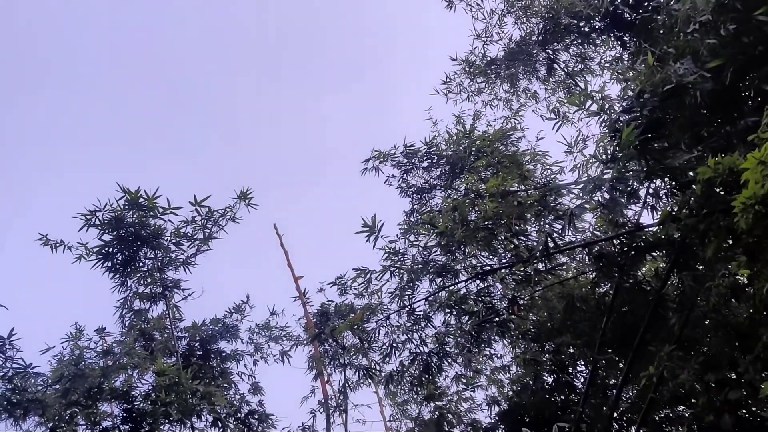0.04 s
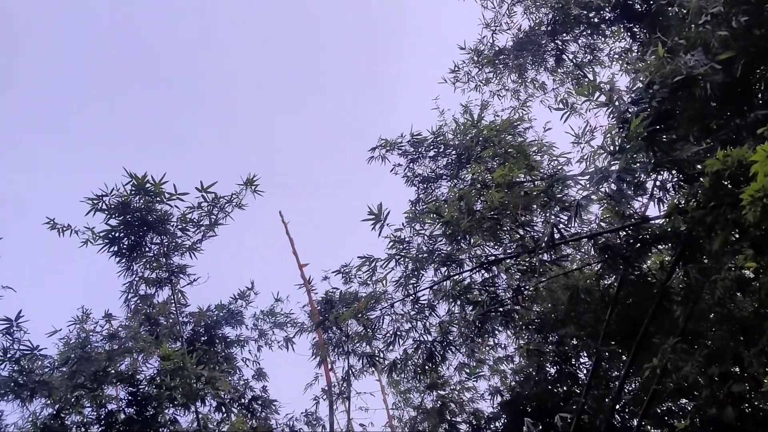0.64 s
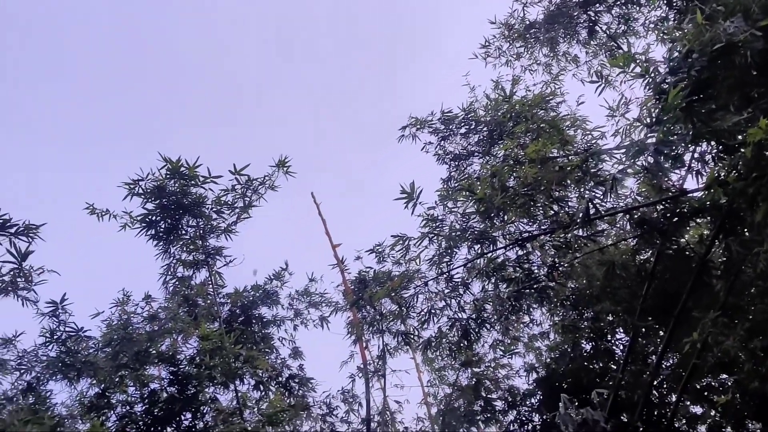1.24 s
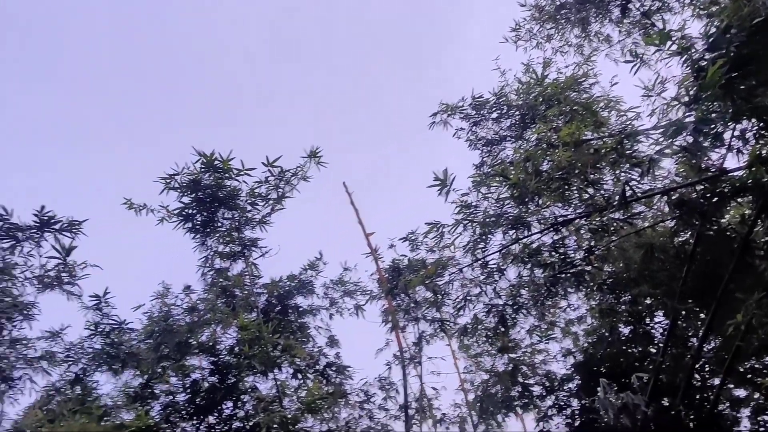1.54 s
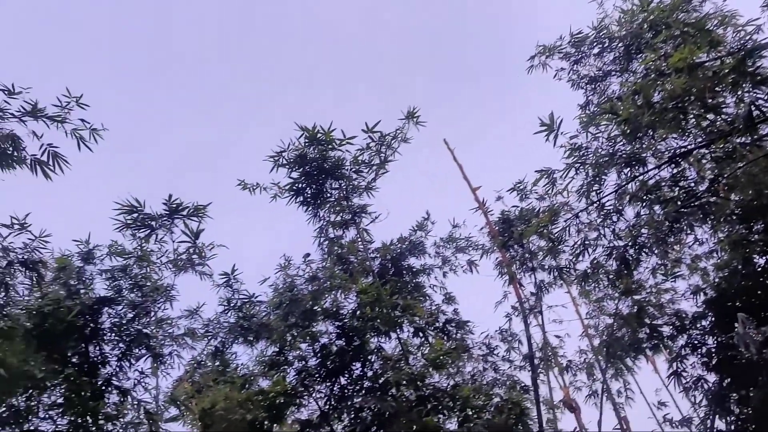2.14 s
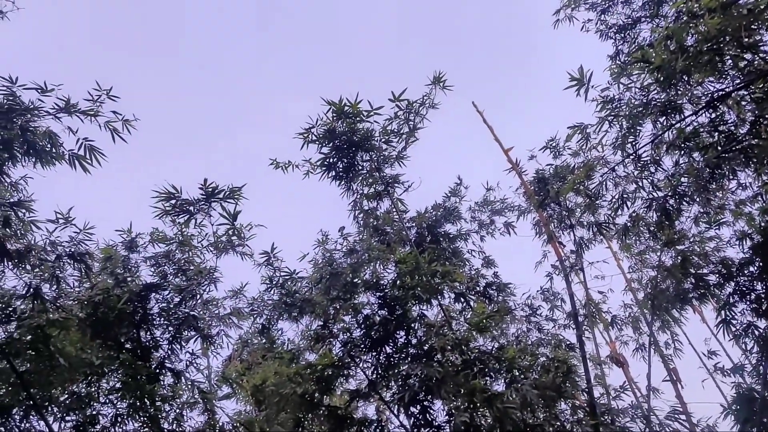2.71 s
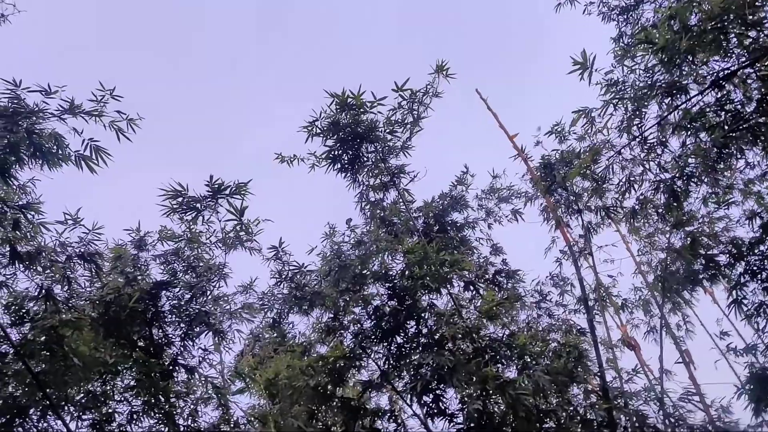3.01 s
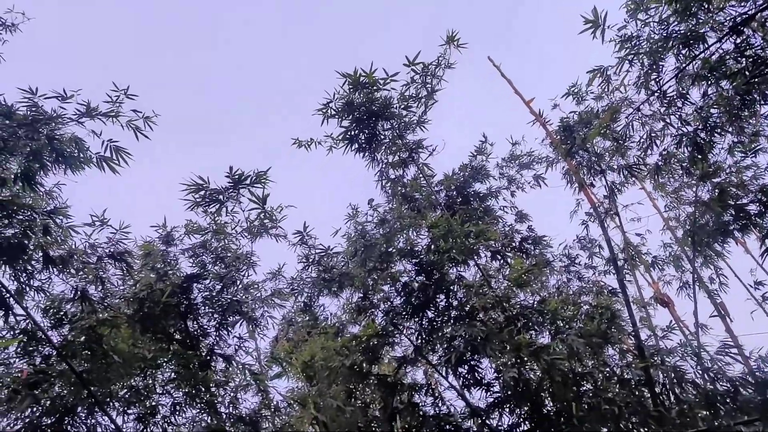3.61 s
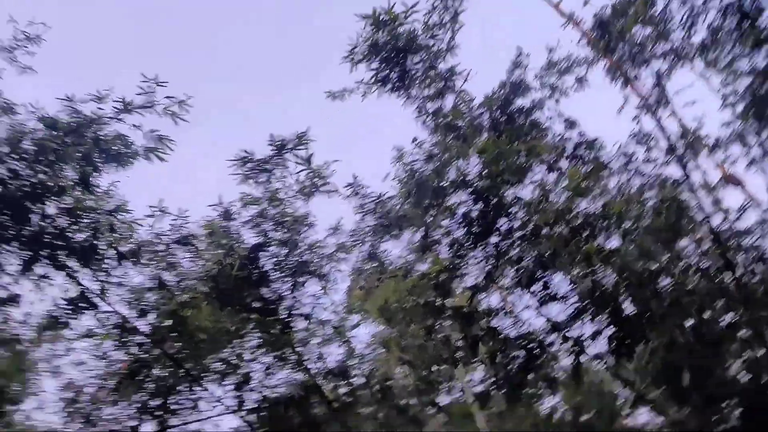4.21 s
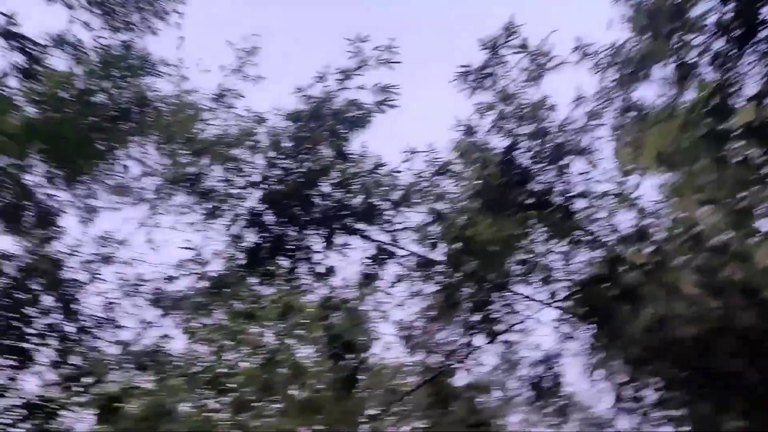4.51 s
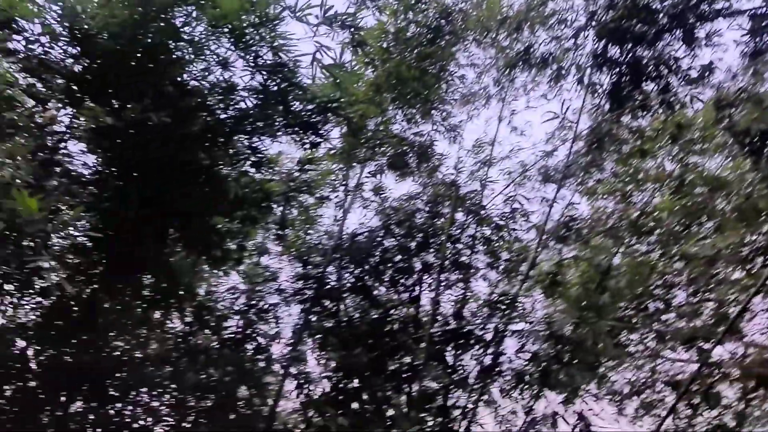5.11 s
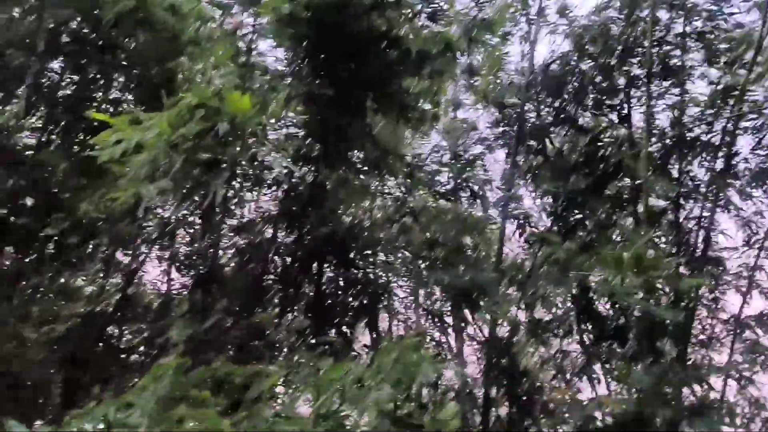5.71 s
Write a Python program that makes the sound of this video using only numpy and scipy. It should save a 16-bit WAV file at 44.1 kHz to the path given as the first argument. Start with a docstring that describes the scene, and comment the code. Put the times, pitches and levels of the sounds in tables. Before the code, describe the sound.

Hundreds of birds chirp together among the trees in a steady din, while crows caw and a far engine hums faintly.

```python
"""A large flock chatters at its roost in a bamboo grove at dusk, heard by two spaced microphones.
From the start, hundreds of far calls melt into a din over a distant engine's hum, while nearer birds
whistle, rasp and peep with fluttering membranes, their calls scattered by the stems. A crow caws twice
in the first second; the din eases near 2 s. From 2.6 s comes a run of hoarse caws, joined by two nasal
squawks around 4 s. The flock surges once more at 5.5 s, with a last flurry of whistles."""
import sys
import numpy as np
from scipy import signal
from scipy.fft import rfft, irfft
from scipy.io import wavfile
from scipy.ndimage import uniform_filter1d

SR = 44100
rng = np.random.default_rng(int(sys.argv[2]) if len(sys.argv) > 2 else 0)


def materialize(psi):
    """Save the field psi as 16-bit PCM at rate SR to the path in sys.argv[1].

    A 1-D psi becomes a single channel; in a 2-D psi each row is a channel.
    """
    bounded = np.clip(np.atleast_2d(psi).T, -1, 1)
    quanta = np.round(bounded * 32767).astype(np.int16)
    wavfile.write(sys.argv[1], SR, quanta)


N = 253575
T = np.arange(N) / SR
MIC_LAG_S = .00046  # sound's travel time between the microphones


def gain_of(db):
    """Decibels to amplitude."""
    return 10 ** (np.asarray(db) / 20)


def unit_rms(x):
    """Scales to rms 1."""
    return x / np.sqrt(np.mean(x ** 2) + 1e-20)


def curve_at(points, hz):
    """Reads a curve on a log-frequency axis."""
    f, value = np.transpose(points)
    return np.interp(np.log(hz + 1), np.log(f + 1), value)


def wander(t, per_s, size=256):
    """A random line with per_s turns a second."""
    return np.interp(t * per_s, np.arange(size), rng.standard_normal(size))


def place(mix, s, sound, side):
    """Places a call; it reaches the microphone on its side (-1 left, 1 right) first."""
    for channel, lag in zip(mix, (side * MIC_LAG_S, 0)):
        start = round((s + lag) * SR)
        part = channel[max(start, 0):max(start + len(sound), 0)]
        part += sound[max(-start, 0):][:len(part)]


# Tone of the rumble bed: (frequency [Hz], relative level [dB])
RUMBLE_EQ = [(20, -5), (35, 10), (48, 5.5), (80, 3), (130, -1), (200, -7.5), (330, -10), (450, -8.5),
             (570, -5.5), (780, -10), (1100, -15), (2000, -17)]
def rumble(level_db=-41.5, likeness=0.93):
    """Distant rumble from all sides: alike in both microphones only at long wavelengths."""
    hz = np.fft.rfftfreq(N, 1 / SR)
    left, other = rfft(rng.standard_normal((2, N)))
    coherence = likeness * np.sinc(2 * hz * MIC_LAG_S)
    right = coherence * left + np.sqrt(1 - coherence ** 2) * other
    spectrum = np.array([left, right]) * gain_of(curve_at(RUMBLE_EQ, hz))
    return gain_of(level_db) * unit_rms(irfft(spectrum, N))


# Partials of the engine drone: (order [multiple of engine speed], level [dB])
ENGINE_ORDERS = [(2, -41.5), (3, -47.5), (4, -54.5), (5, -58.5)]
def engine(speed_hz=34.5, drift=0.0075, waver_db=.9):
    """The low orders of a far engine at a nearly steady speed."""
    turns = np.cumsum(speed_hz * (1 + drift * wander(T, 3.075))) / SR
    hum = np.zeros(N)
    for order, db in ENGINE_ORDERS:
        level = gain_of(db + waver_db * wander(T, 6.7))
        hum += level * unit_rms(np.sin(2 * np.pi * (order * turns + rng.random())))
    return hum


# Reverb decay of the bamboo: (frequency [Hz], time to fall 60 dB [s])
GROVE_DECAY = [(500, 0.29), (3000, 1), (6000, 0.88), (14000, 0.13)]
def grove(x, tail_db, early_db, early_s=0.014, echoes_per_s=3000):
    """Stems and leaves scatter each call: a quick cluster of echoes, then a soft tail."""
    t = np.arange(SR) / SR
    taps = rng.standard_normal((2, SR)) * (rng.random((2, SR)) < echoes_per_s / SR) * (t > .002)
    hz, age, spectrum = signal.stft(taps, SR, nperseg=256)
    decay = gain_of(-60 * age / curve_at(GROVE_DECAY, hz)[:, None])
    tail = signal.istft(spectrum * decay, SR, nperseg=256)[1][:, :SR]
    early = taps * np.exp(-t / early_s)
    echo = (gain_of(tail_db) * unit_rms(tail) + gain_of(early_db) * unit_rms(early)) / np.sqrt(SR)
    heard = x + signal.fftconvolve(x, echo, axes=1)[:, :x.shape[1]]
    return heard / np.sqrt(1 + gain_of(2 * tail_db) + gain_of(2 * early_db))


def syrinx(t, hz, rough, jitter=0.092, shimmer=0.51, flutter_per_s=1100):
    """Phase and strength of a membrane that flutters more in a harsh call."""
    fluttering_hz = hz * (1 + jitter * rough * wander(t, flutter_per_s, size=512))
    phase = 2 * np.pi * np.cumsum(fluttering_hz) / SR
    return phase, np.exp(shimmer * np.sqrt(rough) * wander(t, 316.3))


def chirp(length, start_hz, middle_hz, end_hz, db, rough, octave_db=-27):
    """One whistle bent through three pitches, with a weak octave."""
    t = np.arange(0, length, 1 / SR)
    u = t / t[-1]
    hz = start_hz + (end_hz - start_hz) * u + (2 * middle_hz - start_hz - end_hz) * 2 * u * (1 - u)
    phase, strength = syrinx(t, hz, rough)
    swell = abs(np.sin(np.pi * u)) ** .3 * np.minimum(1, 10 * np.minimum(u, 1 - u))
    tone = np.sin(phase) + gain_of(octave_db) * np.sin(2 * phase)
    return gain_of(db) * unit_rms(swell * strength * tone)


def far_calls(count, low_hz, high_hz, length_s, bend, spread_db, harsh, thickets):
    """Short glides of random pitch, bend and distance; each thicket has its own echoes."""
    lead = SR // 4  # pre-roll: the calling is already under way at the start
    buses = np.zeros((thickets, 2, N + lead))
    for k, (when, pitch, length, first, last, near, rough, side) in enumerate(rng.random((count, 8))):
        hz = low_hz * (high_hz / low_hz) ** pitch
        start_hz, end_hz = hz * (1 + bend * (2 * np.array([first, last]) - 1))
        call = chirp(length_s * (.5 + length), start_hz, hz, end_hz,
                     spread_db * near, 0.099 + harsh * rough)
        place(buses[k % thickets], (k + when) / count * (N + lead) / SR, call, 2 * side - 1)
    return unit_rms(sum(grove(bus, tail_db=-4, early_db=-8) for bus in buses)[:, lead:])


# Flicker of the wash: (frequency [Hz], rms depth [dB])
WASH_FLICKER = [(1500, 0.2), (4000, 2), (7000, 1.5), (12000, 2.2)]
def wash(hz, frames):
    """Spectrogram of the farthest calls, run together and flickering in call-sized patches."""
    noise = signal.stft(rng.standard_normal((2, N)), SR, nperseg=1024, noverlap=768)[2]
    patches = uniform_filter1d(rng.standard_normal((len(hz), frames)), size=36, axis=0)
    patches = uniform_filter1d(patches, size=9, axis=1)
    return noise * gain_of(curve_at(WASH_FLICKER, hz)[:, None] * unit_rms(patches))


# Fader ride of the flock's effort about its mean: (time [s], low voices [dB], high voices [dB])
FLOCK_EFFORT = [(0.0, 1.5, 0.5), (0.38, 0, 2), (0.5, -0.7, -0.6), (1.12, 0.5, -0.4), (1.62, 0, -2.6),
                (1.88, 0, -3.5), (2.12, -0.5, -1.8), (2.38, -1, -0.5), (2.5, -1.0, -2.0),
                (3.25, -0.54, 0.2), (4.0, 1, 1), (4.12, 1, -0.3), (4.5, -0.3, 1), (4.62, 1.1, -0.4),
                (5.0, -2.5, -0.3), (5.25, 0, -2), (5.5, 0.5, 2), (5.75, -1, -2.6)]
# How strongly each band follows that ride: (frequency [Hz], depth [dB per dB])
EFFORT_DEPTH = [(1500, 1.5), (4000, 1.08), (7000, 0.78), (12000, 1.8)]
def effort(hz, t, crossover_hz=(2620, 4050), bicker_per_s=14, bicker_db=1.3):
    """Gain by band and time as the flock swells and eases; the high voices add quick random surges."""
    s, low_db, high_db = np.transpose(FLOCK_EFFORT)
    low = np.interp(t, s, low_db)
    high = np.interp(t, s, high_db) + bicker_db * wander(t, bicker_per_s)
    high_share = np.interp(hz, crossover_hz, (0, 1))[:, None]
    return gain_of(curve_at(EFFORT_DEPTH, hz)[:, None] * ((1 - high_share) * low + high_share * high))


# Tone of the far flock in the grove: (frequency [Hz], relative level [dB])
DIN_EQ = [(800, -27), (1150, -17.5), (1350, -14), (1650, -9), (2000, -10), (2450, -5), (2900, -2.5),
          (3900, -2.5), (4700, -6), (5400, -14.5), (7500, -18.5), (9000, -26), (12000, -25), (15000, -30.5)]
def din(level_db=-20, wash_db=-3, low_cut_db_per_octave=20):
    """The far flock: chatter, low squawks and a few closer whistles melt together."""
    chatter = far_calls(1500, 2350, 4800, length_s=.055, bend=.2, spread_db=4, harsh=.45, thickets=4)
    low = far_calls(400, 1100.7, 2400, length_s=.09, bend=.146, spread_db=2, harsh=1.033, thickets=2)
    closer = far_calls(50, 2573, 4900, length_s=.0548, bend=.0814, spread_db=4, harsh=.1, thickets=1)
    flock = chatter + gain_of(-12.5) * low + gain_of(-14) * closer
    hz, t, spectrum = signal.stft(flock, SR, nperseg=1024, noverlap=768)
    spectrum += gain_of(wash_db) * wash(hz, len(t))
    # flatten, then give the flock the grove's colour, rolling off below its lowest voices
    average = np.sqrt(uniform_filter1d(np.mean(abs(spectrum) ** 2, axis=(0, 2)), size=3))
    octaves_below = np.maximum(np.log2(DIN_EQ[0][0] / (hz + 1)), 0)
    colour = gain_of(curve_at(DIN_EQ, hz) - low_cut_db_per_octave * octaves_below)
    spectrum *= (colour / average)[:, None] * effort(hz, t)
    return gain_of(level_db) * unit_rms(signal.istft(spectrum, nperseg=1024, noverlap=768)[1][:, :N])


# Pitch envelope of a caw or squawk: (position in the call [0-1], pitch [share of top pitch])
PITCH_ARCH = [(0, .93), (.12, .99), (.3, 1), (.65, .94), (1, .87)]
def caw(length, top_hz, db, rough, throat_hz, throat_width_hz=180, fundamental_db=-9, harmonics=4):
    """A hoarse harmonic call through one broad throat resonance."""
    t = np.arange(0, length, 1 / SR)
    hz = top_hz * np.interp(t / length, *np.transpose(PITCH_ARCH))
    phase, strength = syrinx(t, hz, rough)
    partials = [np.sin(k * phase) / np.hypot(1, (k * hz - throat_hz) / throat_width_hz)
                for k in range(1, harmonics + 1)]
    # a small beak radiates the fundamental poorly
    voice = gain_of(fundamental_db) * partials[0] + sum(partials[1:])
    return gain_of(db) * unit_rms(voice * strength * signal.windows.tukey(len(t), .4))


# Cues for the near crows:
# (time [s], length [s], top pitch [Hz], level [dB], roughness [0-1], throat resonance [Hz])
CROW_CUES = [(0.502, 0.41, 596, -39, 0.13, 1800), (0.884, 0.34, 596.5, -34, 0.14, 1750),
             (2.634, 0.26, 592, -36.5, 0.17, 1770), (3.02, 0.3, 552, -35.5, 0.1, 1600),
             (3.321, 0.27, 592, -32.5, 0.1, 1600), (3.531, 0.24, 544, -38.5, 0.18, 1560),
             (3.727, 0.24, 680, -42.5, 0.08, 980), (3.875, 0.31, 604.4, -30.5, 0.11, 1780)]
def crows(far_count=40, far_hz=620):
    """A few crows call clearly on the right; many more call from far off on both sides."""
    near, far = np.zeros((2, 2, N))
    for s, *settings in CROW_CUES:
        place(near, s, caw(*settings), side=rng.uniform(0.46, 1))
    for k, (when, pitch, side) in enumerate(rng.uniform(-1, 1, (far_count, 3))):
        call = caw(.3, far_hz * (1 + .2 * pitch), db=-52, rough=0.48, throat_hz=1400)
        place(far, (k + when) / far_count * N / SR, call, side)
    return grove(near, tail_db=-7, early_db=-12) + grove(far, tail_db=0, early_db=-6)


# Cues for the peeping bird: (time [s], level before trim [dB])
PEEP_CUES = [(0, -38), (.48, -46), (.655, -39), (0.801, -35), (2.255, -30)]
def peeps(length_s=0.039, hz=1427, scoop=0.039, trim_db=1.2):
    """One bird repeats a soft low note, scooping up into it from slightly flat."""
    return [(s, chirp(length_s, hz * (1 - scoop), hz, hz, db + trim_db, rough=.05))
            for s, db in PEEP_CUES]


# Cues for the squawks: (time [s], length [s], top pitch [Hz], level [dB], throat resonance [Hz])
SQUAWK_CUES = [(3.636, 0.048, 800, -32, 2400), (4.186, .052, 783, -23, 2930)]
def squawks(rough=.1):
    """Nasal calls, rich in overtones: a wide throat resonance over a faint fundamental."""
    return [(s, caw(length, hz, db, rough, throat, throat_width_hz=390, fundamental_db=-24, harmonics=6))
            for s, length, hz, db, throat in SQUAWK_CUES]


# Cues for the scolding: (time [s], length [s], middle pitch [Hz], level before trim [dB])
RASP_CUES = [(.12, 0.11, 6430, -32), (.311, 0.078, 3440, -18.5), (0.325, 0.094, 4600, -24.5),
             (0.692, 0.078, 2550, -27), (.915, 0.065, 3690, -21), (1.168, 0.07, 3850, -25),
             (1.406, 0.071, 3630, -20.5), (1.727, 0.032, 4180, -23), (2.218, .045, 7100, -38),
             (2.403, 0.058, 4230, -26), (2.744, 0.12, 3750, -26.5), (3.064, 0.059, 7460, -32),
             (3.194, .08, 6080, -30.5), (3.929, 0.055, 7260, -33), (3.89, 0.092, 3005, -23),
             (4.33, 0.075, 3300, -28), (4.504, 0.067, 4205, -18.5), (4.831, 0.081, 2930, -26),
             (5.351, 0.09, 3286, -23)]
def rasps(rough=0.84, sag=0.0514, trim_db=-3):
    """Harsh scolding calls: the membrane flutters hard while the pitch sags."""
    return [(s, chirp(length, hz * (1 + sag), hz, hz * (1 - sag), db + trim_db, rough, octave_db=-17.5))
            for s, length, hz, db in RASP_CUES]


# Cues for the lead whistles: (time [s], length [s], start pitch [Hz], middle pitch [Hz],
# end pitch [Hz], level before trim [dB], roughness [0-1])
WHISTLE_CUES = [ (.051, 0.069, 2810, 2870, 2950, -24.5, 0.18), (0.17, 0.052, 7000, 5700, 4900, -27, .4),
                (0.197, 0.029, 3314, 3230, 3180, -17, .1), (0.22, 0.03, 5020, 4820, 4900, -17.5, .35),
                (0.387, .06, 4850, 4930, 4950, -28, 0.26), (0.556, .028, 6050, 6040, 5980, -27, 0.2),
                (.585, .07, 5950, 5900, 5900, -35, 0.5), (0.814, .11, 5090, 4800, 4200, -25.5, 0.4),
                (0.996, 0.03, 3880, 3880, 3880, -18, 0.06), (1.033, 0.058, 3980, 3370, 3150, -23, .08),
                (1.116, 0.037, 4820, 4580, 4460, -24.5, .15), (1.135, 0.19, 2940, 2970, 2940, -24, 0.18),
                (1.221, 0.032, 3420, 3270, 3000, -21, .25), (1.403, .024, 3890, 3880, 3860, -23, 0),
                (1.652, 0.059, 2770, 2430, 2250, -28, 0.24), (1.875, 0.073, 3010, 3106, 2920, -22.5, 0.37),
                (2.152, 0.05, 4880, 5150, 5200, -28, .2), (2.221, 0.031, 4720, 4730, 4690, -24, .15),
                (2.25, 0.044, 3160, 3145, 3090, -17, 0.3), (2.325, 0.041, 3240, 3190, 3120, -20.5, .1),
                (2.35, 0.055, 4710, 4750, 4650, -20, 0.19), (2.382, 0.043, 4440, 4250, 3940, -22, .45),
                (2.56, 0.093, 5060, 5060, 5050, -27, 0.15), (2.751, .1, 4280, 4390, 4340, -22.5, 0.2),
                (2.952, 0.077, 4600, 4600, 3660, -18, 0.3), (3.02, 0.079, 4650, 4790, 4790, -24, 0.17),
                (3.06, 0.043, 3990, 3790, 3510, -17, .3), (3.11, 0.037, 5190, 4500, 4100, -21, 0.1),
                (3.245, 0.074, 4800, 4250, 3850, -21, .4), (3.322, .05, 5620, 5640, 5540, -28, .25),
                (3.437, 0.1, 2950, 3520, 4400, -19.5, .35), (3.493, .05, 4620, 4620, 4680, -29, 0.03),
                (3.578, .038, 3080, 3120, 3220, -28, 0.1), (3.64, 0.078, 3950, 4145, 4570, -19, .35),
                (3.651, 0.032, 4670, 4720, 4660, -17, 0.24), (3.68, 0.053, 5680, 5740, 5670, -26, 0.3),
                (3.703, 0.064, 4700, 4690, 3670, -21, 0.29), (3.868, 0.06, 4170, 5520, 5830, -25, 0.26),
                (3.921, .058, 5950, 4910, 4050, -19, .26), (3.966, 0.072, 4900, 6250, 6800, -25, 0.44),
                (4.067, .11, 3000, 3220, 3420, -21, .35), (4.22, 0.042, 7650, 7550, 7350, -37, 0.1),
                (4.52, 0.046, 4250, 4380, 4580, -23, .22), (4.55, 0.035, 3390, 2890, 2500, -24, .1),
                (4.659, .05, 3720, 3780, 3930, -24, .15), (4.715, .06, 4200, 4480, 4570, -24, 0.16),
                (4.773, 0.046, 7150, 7280, 7350, -34, .35), (4.866, .06, 7800, 7780, 7900, -37, .15),
                (4.995, 0.028, 5900, 6000, 5900, -27, .35), (5.574, 0.054, 4740, 4520, 4150, -20.5, .13),
                (5.599, 0.041, 5460, 5480, 5600, -29, 0.2), (5.621, 0.036, 4240, 4630, 5270, -21, .22),
                (5.659, .055, 5060, 3950, 2700, -20.5, .14)]
def whistles(trim_db=-3.5):
    """Short bright glides from a lightly fluttering membrane."""
    return [(s, chirp(length, start, middle, end, db + trim_db, rough))
            for s, length, start, middle, end, db, rough in WHISTLE_CUES]


def near_birds(crown_count=3):
    """Calls from the closest crowns, on the right; each crown has its own echoes."""
    crowns = np.zeros((crown_count, 2, N))
    for k, (s, call) in enumerate(whistles() + rasps() + squawks() + peeps()):
        place(crowns[k % crown_count], s, call, side=rng.uniform(0.81, 1))
    return sum(grove(crown, tail_db=-9, early_db=-7) for crown in crowns)


def scene():
    """Birds all round, over a low bed that leans slightly left."""
    return din() + near_birds() + crows() + (rumble() + engine()) * gain_of([[.3], [-.3]])


def record(dry):
    """A steep low-pass takes off the top treble."""
    low_pass = signal.firwin(511, cutoff=15600, window=("kaiser", 9), fs=SR)
    return signal.oaconvolve(dry, low_pass[None], "same")


dry = scene()
out = record(dry)
materialize(out)
```